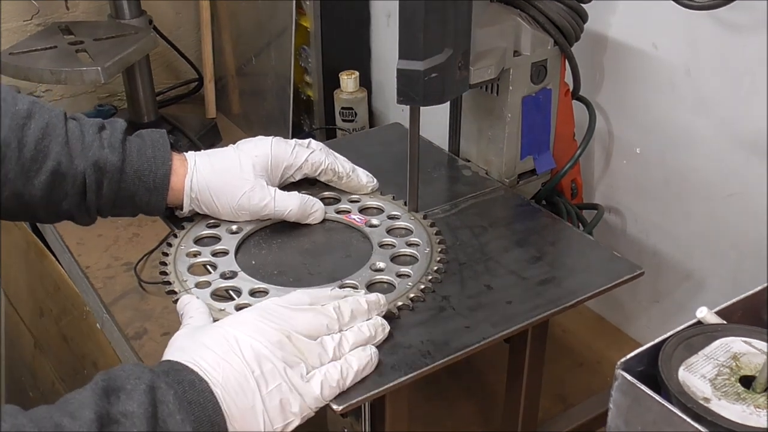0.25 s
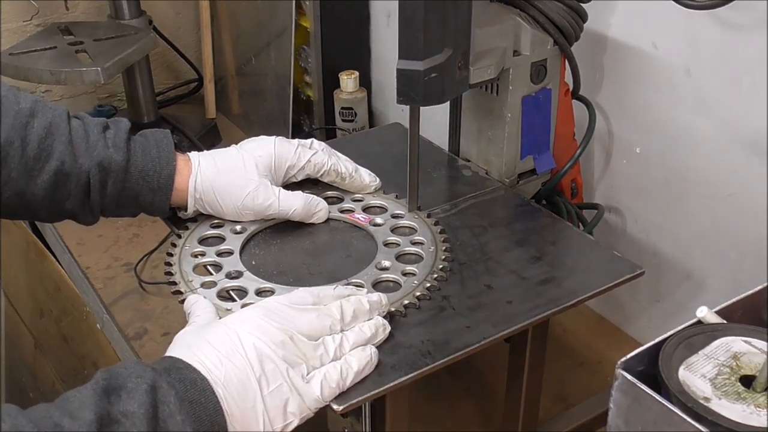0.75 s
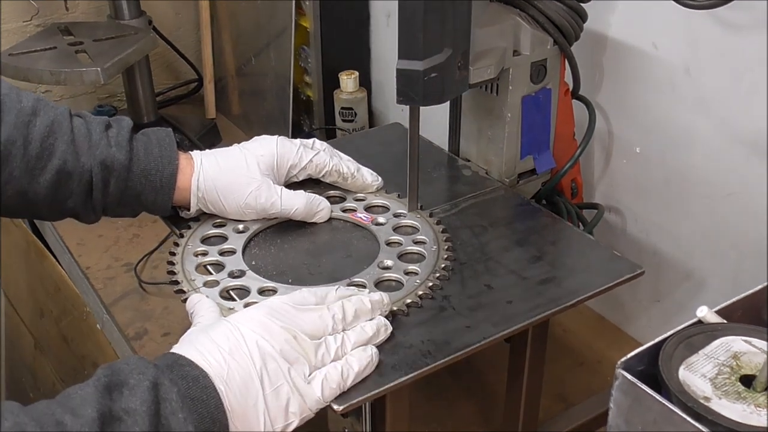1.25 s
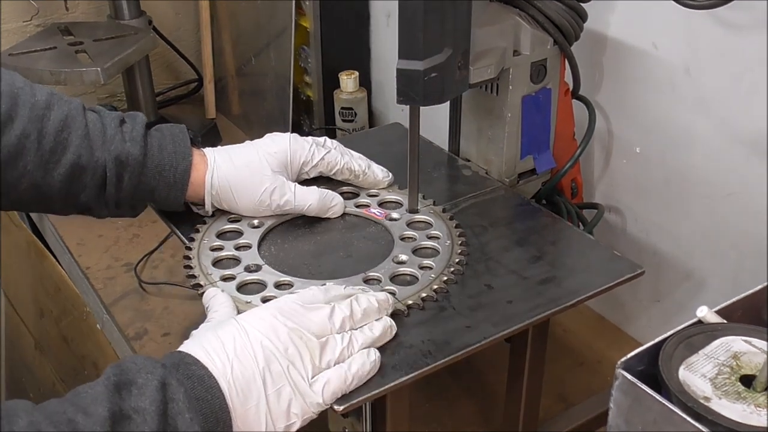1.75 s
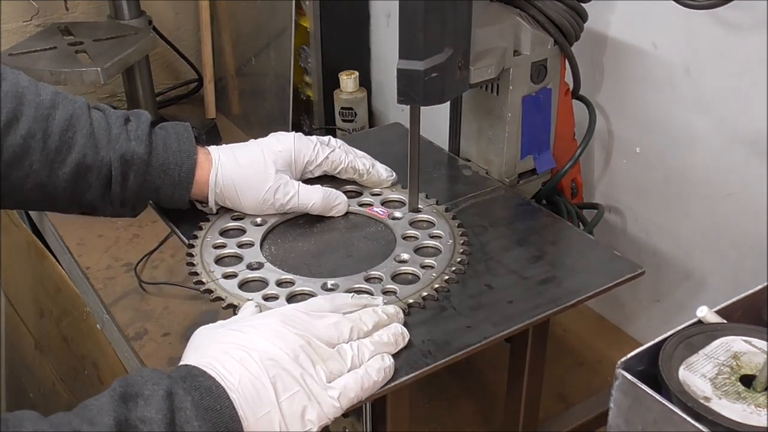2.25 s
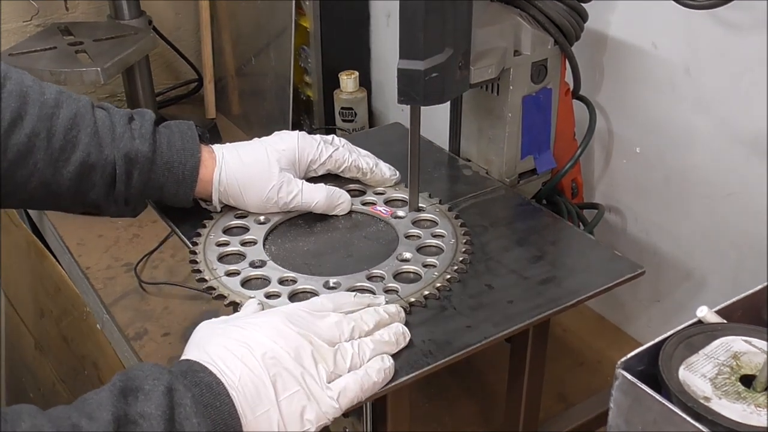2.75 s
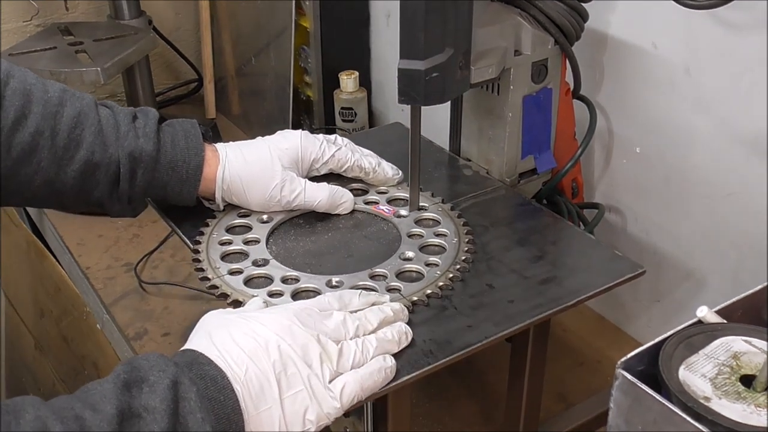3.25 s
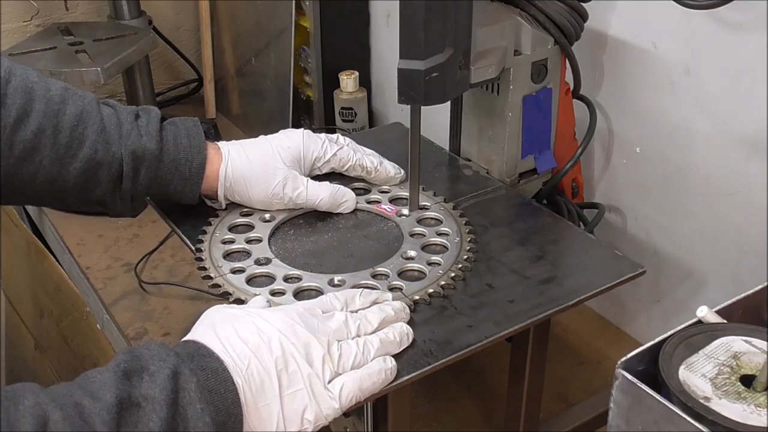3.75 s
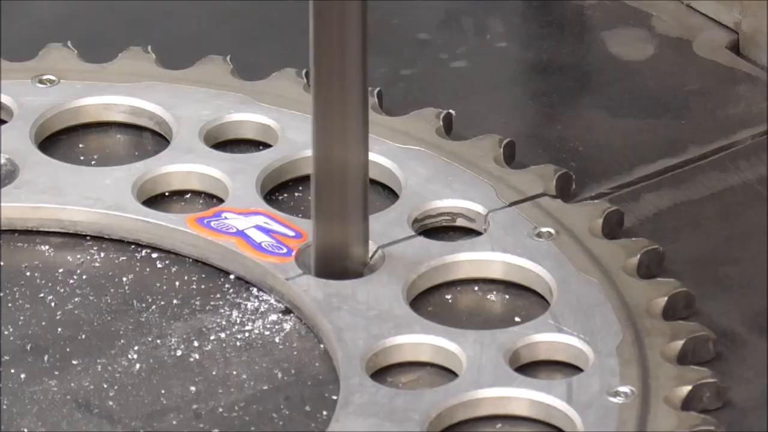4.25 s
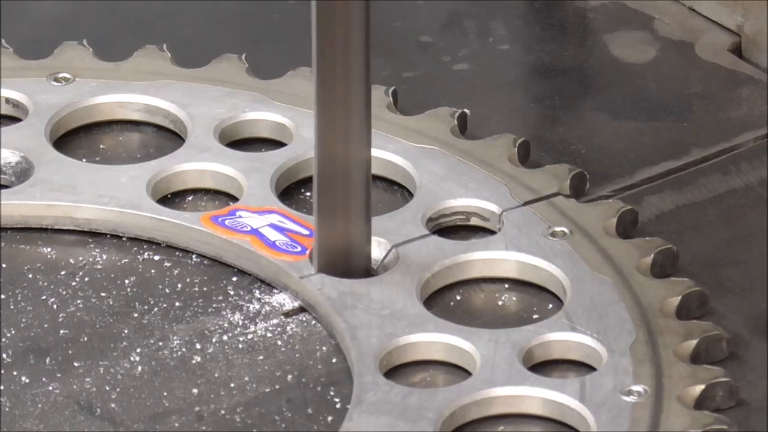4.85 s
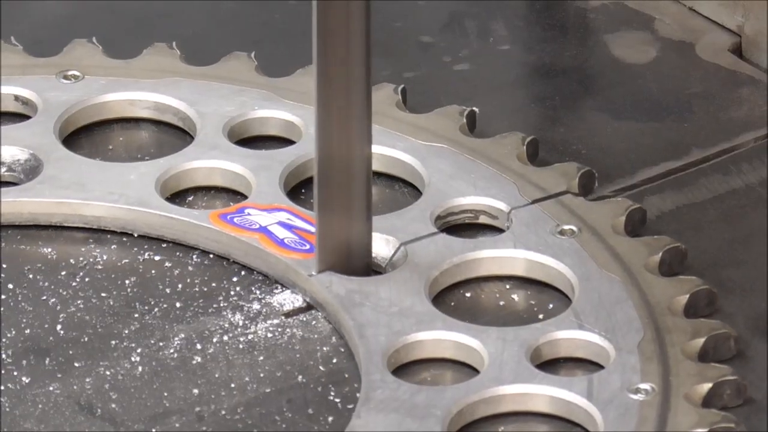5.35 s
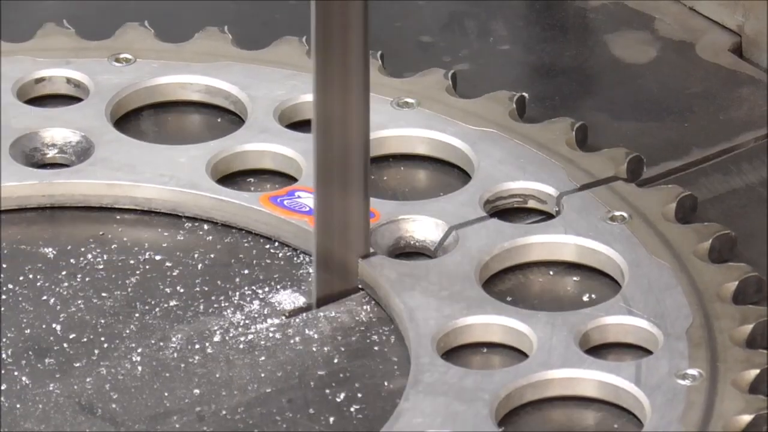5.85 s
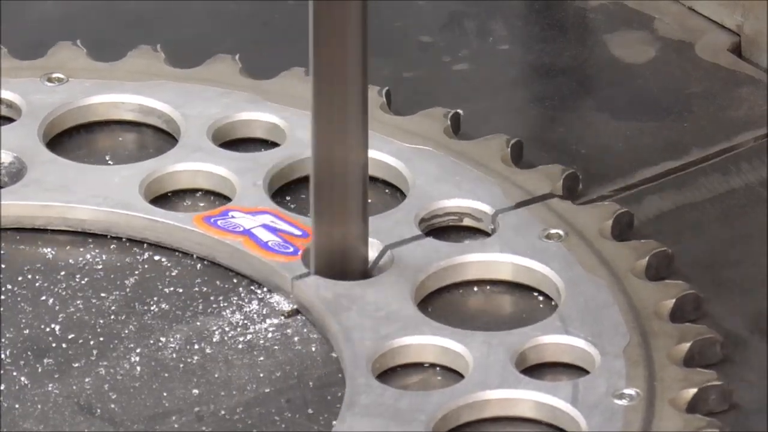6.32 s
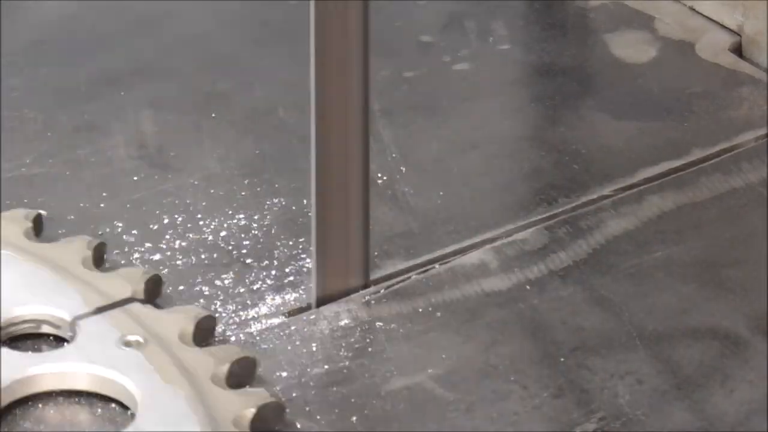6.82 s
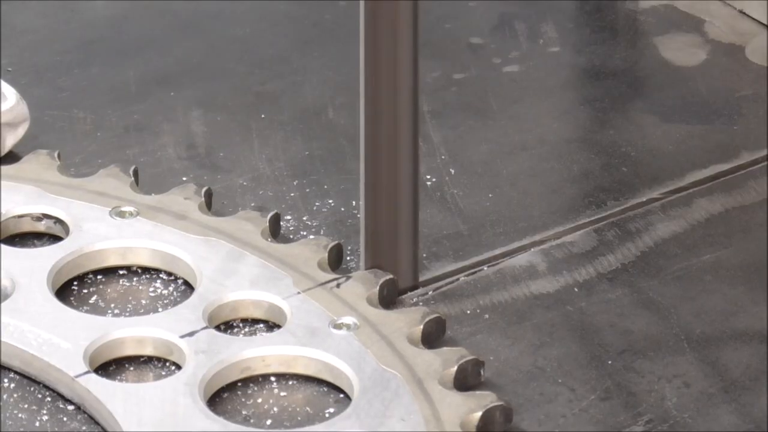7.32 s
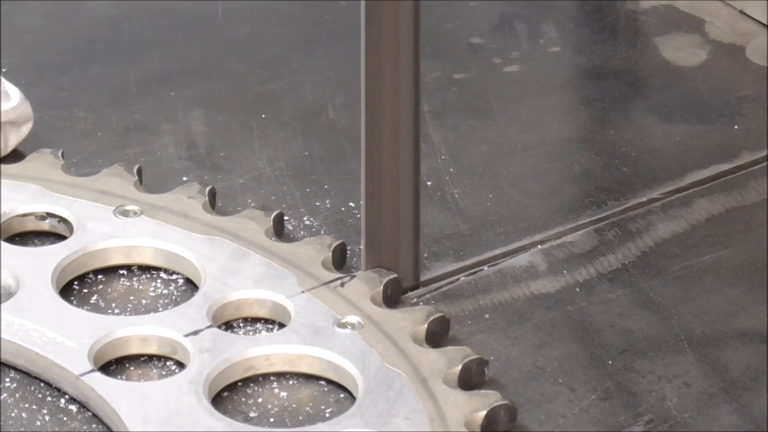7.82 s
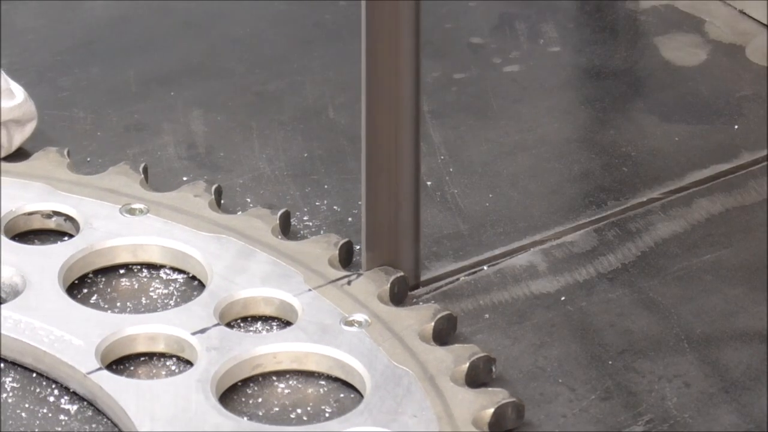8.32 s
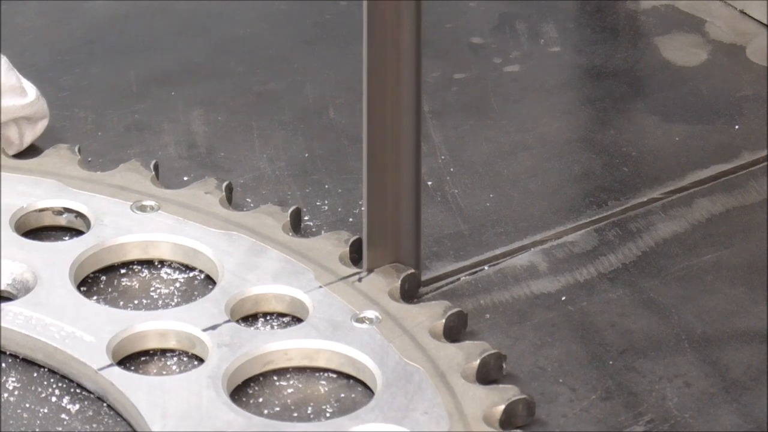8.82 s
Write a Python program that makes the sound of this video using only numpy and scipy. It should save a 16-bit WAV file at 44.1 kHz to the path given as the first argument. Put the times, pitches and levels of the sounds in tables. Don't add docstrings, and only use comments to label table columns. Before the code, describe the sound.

Harsh metallic sawing with a steady motor whine in a small workshop, first distant, then close and bright, ending in shrill pulsing squeals.

```python
import sys
import numpy as np
from scipy import signal
from scipy.fft import rfft, irfft, next_fast_len
from scipy.io import wavfile
from scipy.ndimage import uniform_filter1d

SR = 44100
rng = np.random.default_rng(int(sys.argv[2]) if len(sys.argv) > 2 else 0)


def decibels_to_gain(level_db):
    exponent = np.asarray(level_db, float) / 20
    return 10 ** exponent


def wrap_up_sound(samples):
    columns = np.atleast_2d(samples).T
    tamed = np.clip(columns, -1, 1)
    steps = np.round(tamed * 32767).astype(np.int16)
    wavfile.write(sys.argv[1], SR, steps)


N = 400428
T = np.arange(N) / SR
CLOSER_S, LAST_VIEW_S = 4.299, 7.102
HUM_HZ = 240.03


def by_view(far, near):
    return np.where(T < CLOSER_S, far, near)


def evened(x):
    return x / np.sqrt(np.mean(x ** 2) + 1e-20)


def read(points, hz):
    f, value = np.transpose(points)
    return np.interp(np.log(hz + 1), np.log(f + 1), value, -80, -80)


def played(tables):
    s, *columns = np.transpose(np.concatenate(tables))
    inside = sum((T >= rows[0][0]) * (T <= rows[-1][0]) for rows in tables)
    gate = uniform_filter1d(np.minimum(inside, 1.), size=400)
    return [gate] + [np.interp(T, s, c) for c in columns]


def drift(top_hz):
    low_pass = signal.butter(2, top_hz, fs=SR / 16)
    coarse = signal.lfilter(*low_pass, rng.standard_normal(N // 16 + 2))
    return np.interp(np.arange(N) / 16, np.arange(len(coarse)), evened(coarse))


def swells(s, length, height):
    t = np.arange(0, N + 32, 32) / SR
    hump = np.exp(-4 * np.log(2) * ((t[:, None] - s) / length) ** 2) @ height
    return np.interp(T, t, hump)


def humps(modes, hz):
    return sum(decibels_to_gain(db) ** 2 / (1 + (2 * (hz - f) / width) ** 2) ** 2 for f, width, db in modes)


def ring(drive, gain, lo_hz, hi_hz):
    size = next_fast_len(N)
    hz = np.fft.rfftfreq(size, 1 / SR)
    g = gain(hz)
    share = np.sum(g[(hz > lo_hz) & (hz < hi_hz)] ** 2) / len(hz)
    return irfft(rfft(drive, size) * g / np.sqrt(share), size)[:N]


def body(modes, base):
    return lambda hz: decibels_to_gain(read(base, hz)) * np.sqrt(1 + humps(modes, hz))


def teeth(grain_db, chatter_db):
    return evened(rng.standard_normal(N) * decibels_to_gain(grain_db * drift(1040) + chatter_db))


def walls(x, colour):
    count = 6000
    taps = rng.standard_normal(count) * decibels_to_gain(-60 * np.arange(count) / SR / 0.12)
    hz = np.fft.rfftfreq(2 * count, 1 / SR)
    f, db = np.transpose(colour)
    gain = decibels_to_gain(np.interp(np.log(hz + 1), np.log(f), db))
    tail = irfft(rfft(taps / np.linalg.norm(taps), 2 * count) * gain)
    return signal.oaconvolve(x, tail)[:N]


def loudness(part, feed_db):
    far_db, near_db, share = part
    return by_view(far_db, near_db) + share * feed_db


# time in seconds, feed in dB.
FEED = [(0, -2), (.12, -1.5), (.3, -4.5), (.68, -4), (.82, 0.5), (1.65, 0), (2.9, 0.5), (4.28, -0.17),
        (5.5, -0.2), (6.3, 0.74), (7.4, 1.2), (7.6, -0.5), (7.75, -4.5), (8.0, -7.5), (8.4, -6.5),
        (8.55, -3.5), (8.9, -1), (9.08, -1.5)]
# time in seconds, length in seconds, felt
# in table in dB, in blade in dB.
NUDGES = [(0.06, .04, 2.5, -2.1), (.41, 0.047, -4, -4), (0.475, 0.048, 1.5, 1.5), (.66, 0.078, 1.3, -1),
          (1.46, .05, -1, -1.1), (1.643, 0.07, 1.1, 2.5), (1.808, .06, -0.5, -0.5), (1.916, 0.043, 3, -0.5),
          (1.97, .05, -2, -1.5), (2.695, 0.036, 3, 0.5), (2.737, .04, -3.5, -2.5), (2.943, 0.073, -1, -1.5),
          (3.929, 0.055, -6, -3), (4.18, 0.27, 1.5, 1.3), (4.545, 0.052, -2.2, -1), (5.4, 0.052, -0.5, -1),
          (5.886, 0.027, -8.5, -7.5), (5.925, 0.072, -3.5, -3.5), (6.396, 0.061, -1.3, -2),
          (6.643, 0.085, -4.5, -2), (7.72, 0.027, -2.2, -4), (8.03, 0.043, -2.1, -1), (8.07, 0.037, 1.5, 3),
          (8.163, 0.043, 2, 4), (8.355, 0.087, -2.5, -2.5), (8.458, 0.02, 0.8, -7.5),
          (8.606, 0.052, -4.5, -5), (8.667, 0.038, -1.5, -6), (8.783, 0.055, -1.7, -2.5),
          (8.96, .2, 1.6, -1)]


def hands():
    s, length, low_db, high_db = np.transpose(NUDGES)
    feed_db = np.interp(T, *np.transpose(FEED))
    return feed_db, swells(s, length, low_db), swells(s, length, high_db)


# frequency in Hz, width in Hz, level over the base in dB.
TABLE_MODES = [(970, 290, 6), (1238, 196, 11), (1885, 260, 6.5), (2366, 230, 7)]
PLATE_MODES = [(3030, 300, 8.86), (3352, 324, 6.96), (3860, 280, 2.4), (4110, 230, 2), (4910, 440, 4.8),
               (5740, 110, 2.8), (6100, 310, 2.7)]
BLADE_MODES = [(7080, 73, 1.9), (7690, 330, 1.7), (8360, 99, 1), (13610, 130, 3.7), (14550, 250, 9.4),
               (15000, 190, 4.8), (15500, 260, 4)]
# frequency in Hz, density in dB per Hz.
TABLE_BASE = [(350, -68), (500, -32.5), (800, -23.5), (1300, -7.5), (2000, -1), (2600, -8.5), (3200, 4)]
PLATE_BASE = [(2200, -16), (2700, -3), (4400, 0.5), (5500, -0.5), (6300, -2.5), (7000, -25)]
BLADE_BASE = [(5900, -34), (6500, 2.5), (8500, 2), (9300, -1), (10200, -5), (11500, -2), (13000, 1.5),
              (15700, 3)]


def rasp(table_db, plate_db, blade_db):
    feed = drift(18)
    table = ring(teeth(0.98, 0.3 * feed), body(TABLE_MODES, TABLE_BASE), 1400, 2630)
    plate = ring(teeth(0.65, 0.55 * feed), body(PLATE_MODES, PLATE_BASE), 4140, 6150)
    blade = ring(teeth(1.2, 0.85 * feed), body(BLADE_MODES, BLADE_BASE), 9180, 13610)
    return decibels_to_gain(table_db) * table + decibels_to_gain(plate_db) * plate + decibels_to_gain(blade_db) * blade


# frequency in Hz, level in dB.
ECHO = [(300, -18), (1500, -13), (5000, -13), (15000, -17)]


def echo(cut):
    return walls(cut, ECHO)


# time in seconds, pitch in Hz, level in dB.
GEAR = [
    [(0.0, 1349, -49), (0.01, 1353, -41), (0.27, 1369, -43), (0.38, 1371, -46), (1.61, 1364, -41),
     (2.63, 1365, -45), (4.05, 1369, -45), (4.09, 1361, -38), (4.29, 1367, -41)],
    [(4.31, 1362, -38), (5.81, 1368, -40), (6.17, 1364, -36), (6.88, 1365, -40), (7.44, 1358, -32),
     (7.89, 1361, -43), (8.66, 1364, -41), (8.7, 1363, -36), (9.07, 1366, -34)],
]
GEAR_ORDERS = [1, 2, 3, 5, 6]
# far in dB, near in dB, share of the load.
THIRD = (-45, -35.5, 1.4)
SIXTH = (-48, -39.5, 2.2)
# multiple of HUM_HZ, level in dB.
HUM = [(10, -44.5), (12, -42), (24, -44), (26, -49), (45, -49), (47, -55), (49, -52), (51, -47), (52, -54),
       (57, -45.5), (59, -50), (61, -47), (63, -48)]


def whine_and_hum(plate_db, feed_db, load_db):
    _, hz, first_db = played(GEAR)
    third_db, sixth_db = loudness(THIRD, load_db), loudness(SIXTH, load_db)
    slack_hz = -1.84 * np.minimum(load_db - feed_db, 0)
    turn = 2 * np.pi * np.cumsum(hz + 2.6 * drift(30) + 1.8 * drift(5) + slack_hz) / SR
    levels_db = [first_db + 0.1, third_db - 7.0, third_db, third_db - 11, sixth_db]
    gear = np.zeros(N)
    for k, db in zip(GEAR_ORDERS, levels_db):
        gear += decibels_to_gain(db + 1.74 * drift(29.5) + 1.25 * drift(4.7)) * np.sin(k * turn + k)
    lines = np.zeros(N // 2 + 1, complex)
    for k, db in HUM:
        phase = np.exp(2j * np.pi * rng.random())
        lines[round(round(k) * HUM_HZ * N / SR)] = decibels_to_gain(db) * N / 2 * phase
    hum = irfft(lines, N) * decibels_to_gain(plate_db + 27.0 + 2.1 * drift(15))
    return np.sqrt(2) * (gear + hum)


# time in seconds, pitch in Hz.
SQUEAL_HZ = [(0, 7580), (.04, 7650), (.09, 7742), (.5, 7738), (.62, 7700), (7.5, 7722), (7.82, 7702),
             (8.8, 7702), (8.9, 7730)]
# start in seconds, end in seconds, then resting, half pitch, double pitch in dB.
SPELLS = [
    (0, 0.348, -38, -42, -50),
    (.36, 0.617, -41.5, -46.5, -52),
    (1.751, 3.9, -48, -49, -47),
    (4.297, 4.5, -38.5, -36.5, -40.5),
    (4.501, 5.6, -49.5, -55, -40.5),
    (7.482, 8.36, -35, -63, -38),
    (8.36, 8.86, -41, -54, -45),
    (8.857, 9.084, -31, -43.5, -43),
]
# time in seconds, length in seconds, peak in dB.
FLARES = [(0.102, 0.042, -31), (0.183, .08, -34), (0.253, .06, -34), (0.333, 0.022, -33),
          (0.378, 0.016, -29), (0.492, 0.059, -31), (.56, 0.044, -34), (1.863, 0.083, -45),
          (2.222, 0.14, -44), (2.487, 0.046, -41.5), (3.65, .06, -44), (3.77, 0.042, -41),
          (7.55, 0.062, -22.5), (7.688, 0.072, -21), (7.76, 0.046, -25), (7.856, .06, -26),
          (7.923, .05, -25.5), (8.012, .04, -26), (8.104, 0.033, -21), (8.192, .05, -26),
          (8.293, 0.056, -20.5), (8.427, 0.035, -28), (8.497, 0.032, -25.5), (8.564, 0.057, -22),
          (8.638, 0.023, -27.5), (8.702, 0.012, -20.5), (8.743, 0.022, -20.5), (8.827, 0.04, -24),
          (8.938, 0.045, -23), (9.036, 0.073, -22.5)]


def squeal():
    on, rest_db, half_db, double_db = played([[(a, *dbs), (b, *dbs)] for a, b, *dbs in SPELLS])
    hz = np.interp(T, *np.transpose(SQUEAL_HZ))
    s, length, peak_db = np.transpose(FLARES)
    db = 10 * np.log10(decibels_to_gain(rest_db) ** 2 + swells(s, length, decibels_to_gain(peak_db) ** 2))
    wheel_turn = 2 * np.pi * 22.7 * T
    wheel = np.sin(wheel_turn) + 0.82 * np.sin(2 * wheel_turn + 0.55)
    grip = 1.8 * wheel + 2.5 * drift(78)
    bite = evened(decibels_to_gain(grip - 0.016 * grip ** 2))
    turn = 2 * np.pi * np.cumsum(hz + 9.0 * np.minimum(grip, 0) + 15 * drift(153) + 12 * drift(34)) / SR
    flare_db = db - rest_db
    tone = decibels_to_gain(db) * np.sin(turn)
    tone += decibels_to_gain(half_db + 0.5 * flare_db) * np.sin(turn / 2)
    tone += decibels_to_gain(double_db + 0.45 * flare_db) * np.sin(2 * turn)
    return np.sqrt(2) * on * bite * tone


# time in seconds, level in dB, top mode in dB.
RIM = [
    [(0, -36.5, -44), (.24, -42, -50), (.64, -44, -50)],
    [(7.5, -26.5, -35.5), (7.6, -25.5, -36), (7.85, -32, -28), (8.05, -32, -26), (8.33, -29.5, -19),
     (8.39, -29.5, -24), (8.6, -28, -37.5), (9.07, -28.5, -39)],
]
# frequency in Hz, width in Hz, level in dB.
RIM_MODES_FIRST = [(8350, 460, 2), (8850, 150, -3), (9700, 120, 0), (11620, 120, -2), (13000, 80, -7)]
RIM_MODES_LAST = [(6130, 530, -8), (7030, 160, -6.5), (7770, 240, -1), (8310, 110, 1), (10430, 99, -12),
                  (12040, 140, -11)]
RIM_TOP = [(14815, 220, 0)]


def rim(nudge_db):
    on, db, top_db = played(RIM)
    chatter = teeth(1.1, 2.9 * np.minimum(drift(40), 1.6))
    first = ring(chatter, lambda hz: np.sqrt(humps(RIM_MODES_FIRST, hz)), 8270, 9100)
    last = ring(chatter, lambda hz: np.sqrt(humps(RIM_MODES_LAST, hz)), 8240, 9100)
    top = ring(chatter, lambda hz: np.sqrt(humps(RIM_TOP, hz)), 14650, 14950)
    tones = decibels_to_gain(db - 5.5) * by_view(first, last) + decibels_to_gain(top_db - 4.0) * top
    return on * decibels_to_gain(1.1 * nudge_db) * tones


# frequency in Hz, density in dB per Hz.
STAND = [(30, -24), (180, -23.5), (220, -13), (290, -18.5), (360, -9), (770, 0.5), (980, 14.5), (1300, 4.5)]


def stand(table_db):
    drone = ring(teeth(1.0, 1.4 * drift(18.0)), lambda hz: decibels_to_gain(read(STAND, hz)), 200, 790)
    drone_db = by_view(-22.5, -32.5)
    hum_db = by_view(-25, -35) - 8.5 * (T < 1.7) - 5.0 * (T > LAST_VIEW_S)
    hum = np.sin(4 * np.pi * HUM_HZ * T) * decibels_to_gain(hum_db)
    return decibels_to_gain(table_db) * (drone * decibels_to_gain(drone_db) + hum)


# time in seconds, peak in dB.
BUMPS = [(0.218, -68.5), (0.424, -73), (0.616, -73), (0.837, -66), (1.255, -71), (1.449, -74),
         (1.882, -72.5), (2.085, -65), (2.297, -65.5), (2.504, -69), (2.712, -70.5), (2.916, -70),
         (3.121, -73.5), (3.336, -70), (3.537, -76), (3.871, -69.5), (4.104, -75.5)]
# time in seconds, peak in dB.
SPLICES = [
    (4.298, -41.5),
    (7.102, -38.5),
]


def knocks():
    out, t = np.zeros(N + SR), np.arange(4000) / SR
    bump = np.sin(2 * np.pi * 220 * t) + np.sin(2 * np.pi * 350 * t)
    bump *= (t / 0.009) * np.exp(1 - t / 0.011)
    tick = np.exp(-((t - .001) / 0.0002) ** 2)
    for shape, rows in ((bump, BUMPS), (tick, SPLICES)):
        for s, db in rows:
            out[round(s * SR):][:len(t)] += decibels_to_gain(db) * shape
    return out[:N]


# start in seconds, end in
# seconds, frequency in Hz, width in Hz, level in dB.
RINGS = [(4.31, 4.43, 620, 70, -55), (4.4, 5.85, 635, 60, -58), (7.31, 7.72, 620, 110, -53),
         (7.65, 7.95, 620, 120, -59), (8.55, 9.08, 630, 100, -63), (4.95, 5.88, 11630, 60, -41),
         (6.0, 7.2, 3630, 30, -43), (.74, .97, 1285, 110, -39), (8.5, 9.08, 1290, 30, -41),
         (.62, .75, 7880, 60, -48), (1.41, 1.46, 350, 60, -61), (1.41, 1.46, 600, 120, -58),
         (7.7, 8.85, 8970, 150, -37.5), (7.75, 8.5, 6260, 150, -36.5), (4.6, 5.9, 9830, 30, -48)]


def rings():
    out = np.zeros(N)
    for start, end, f, width, db in RINGS:
        a, b = round(start * SR), min(round(end * SR), N)
        hz = np.fft.rfftfreq(b - a, 1 / SR)
        noise = rfft(rng.standard_normal(b - a))
        tone = irfft(noise * np.sqrt(humps([(f, width, 0)], hz)), b - a)
        out[a:b] += decibels_to_gain(db) * evened(tone) * signal.windows.tukey(b - a, .15)
    return out * decibels_to_gain(2.6 * drift(16))


# frequency in Hz, side against middle in dB.
WALLS_FAR = [(60, -26), (130, -26), (290, -29), (640, -22), (1410, -8.5), (3100, -8), (6820, -14),
             (15000, -11.5)]
WALLS_NEAR = [(60, -30), (130, -34), (290, -43), (640, -59), (1410, -31), (3100, -26), (6820, -29),
              (15000, -29.5)]


def ears(saw):
    near_side = decibels_to_gain(9.5) * walls(saw, WALLS_NEAR)
    far_side = decibels_to_gain(-0.5) * walls(saw, WALLS_FAR)
    side = by_view(far_side, near_side)
    lean_db = by_view(-2, 0.08) / 2
    return np.array([(saw + side) * decibels_to_gain(lean_db), (saw - side) * decibels_to_gain(-lean_db)])


# far in dB, near in dB, share of the feed.
TABLE = (-38.5, -33, 0.77)
PLATE = (-37, -27.5, 0.97)
BLADE = (-43, -32, .35)


def scene():
    feed_db, low_db, high_db = hands()
    mid_db = 0.31 * low_db + 0.54 * high_db
    table_db = loudness(TABLE, feed_db) + low_db
    plate_db = loudness(PLATE, feed_db) + mid_db
    blade_db = loudness(BLADE, feed_db) + high_db
    cut = rasp(table_db, plate_db, blade_db)
    saw = cut + echo(cut) + whine_and_hum(plate_db, feed_db, feed_db + mid_db) + squeal() + rim(high_db)
    saw += stand(table_db + 0.24 * feed_db) + knocks() + rings()
    return ears(saw)


def top_cut(x):
    return signal.sosfilt(signal.butter(12, 16870, fs=SR, output="sos"), x)


def record(dry):
    edge = signal.firwin(1201, 15815, window=("kaiser", 8), fs=SR)
    faded = dry * np.minimum(np.arange(N)[::-1] / 120, 1)
    mix = signal.oaconvolve(faded, edge[None], "same")
    return top_cut(mix)


dry = scene()
out = record(dry)
wrap_up_sound(out)
```